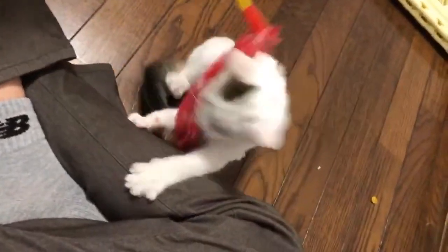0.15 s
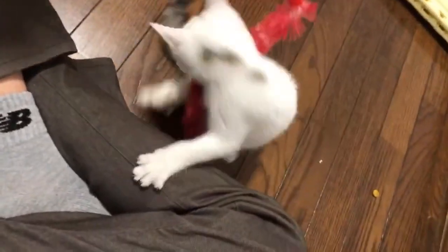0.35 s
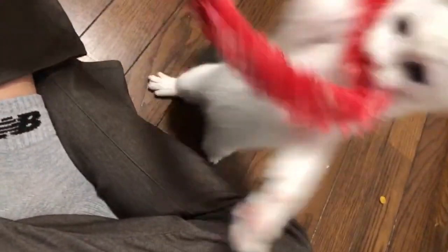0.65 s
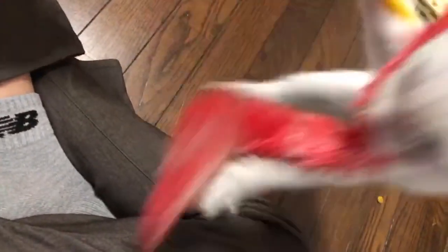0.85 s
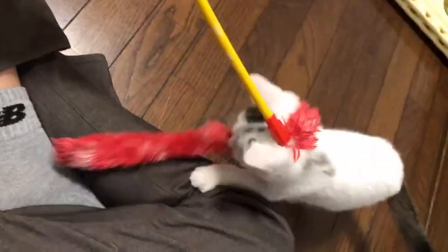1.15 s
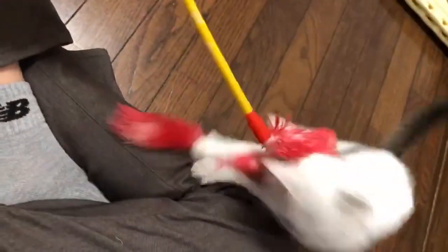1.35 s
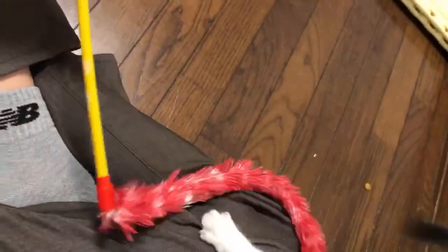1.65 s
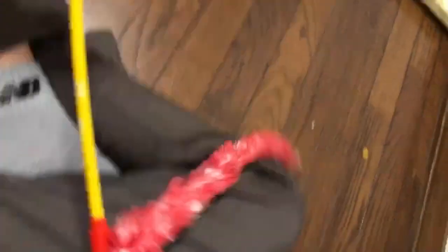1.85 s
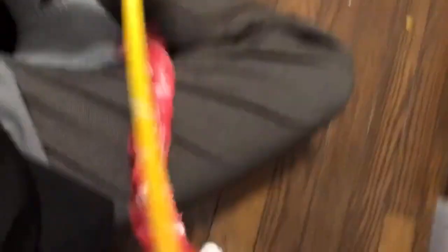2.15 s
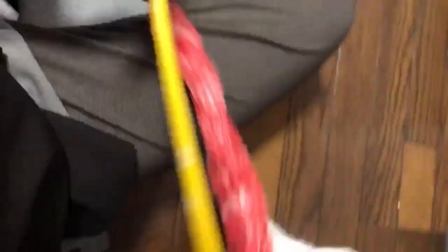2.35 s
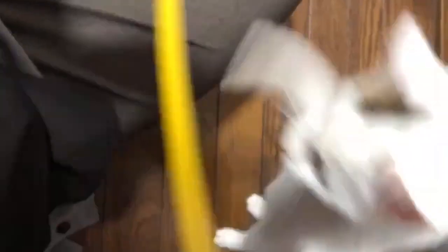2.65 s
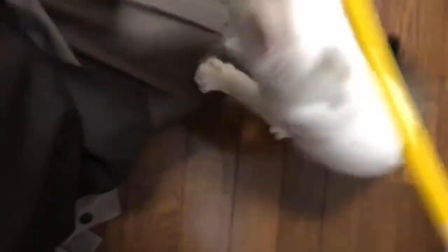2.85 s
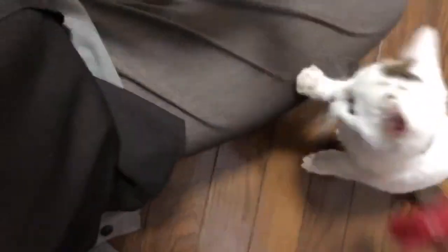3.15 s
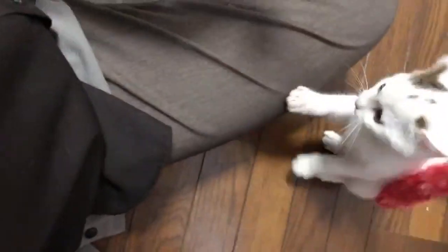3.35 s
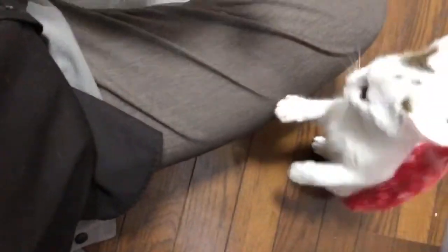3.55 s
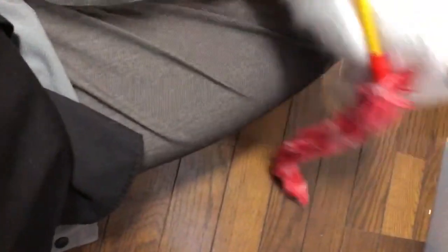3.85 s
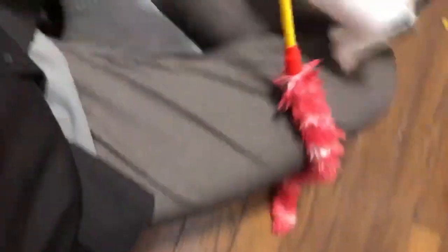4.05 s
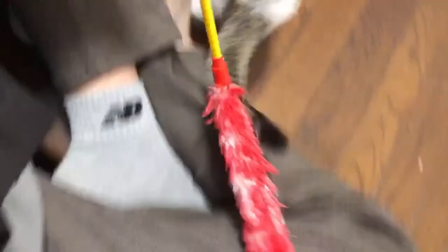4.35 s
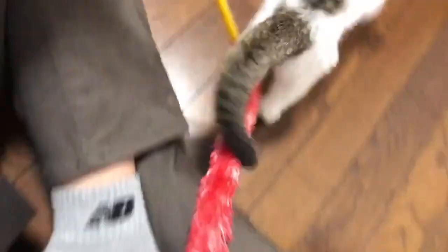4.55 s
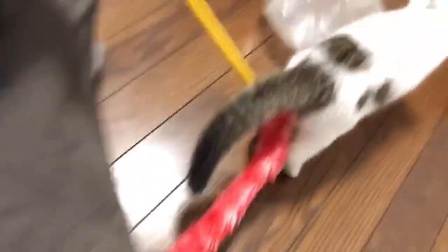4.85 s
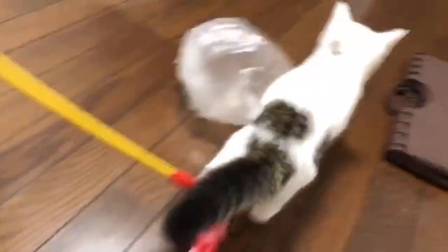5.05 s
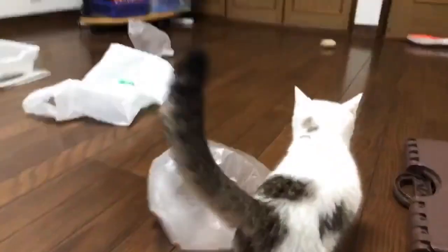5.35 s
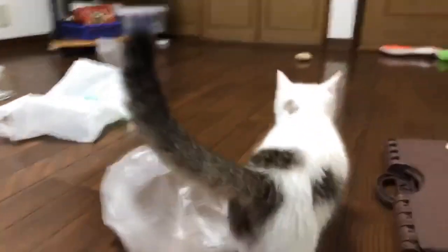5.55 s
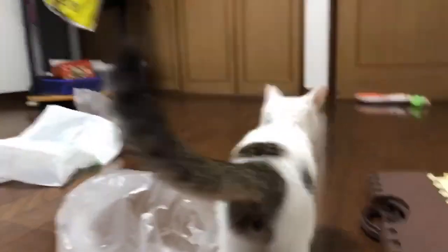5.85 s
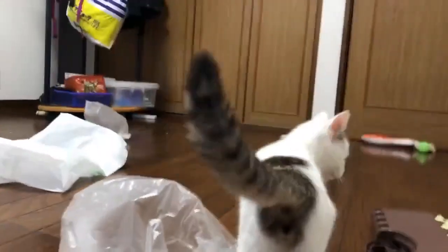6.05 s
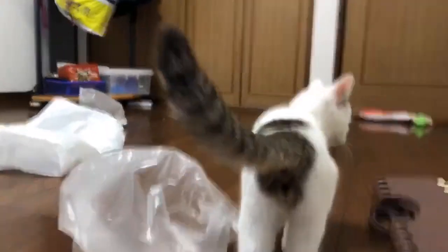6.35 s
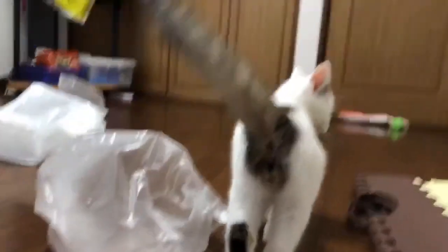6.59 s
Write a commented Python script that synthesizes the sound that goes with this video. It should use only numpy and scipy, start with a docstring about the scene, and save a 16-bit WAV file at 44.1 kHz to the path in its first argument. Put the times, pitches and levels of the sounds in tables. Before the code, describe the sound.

Close phone pickup of a kitten chasing a fluffy wand toy indoors. Dull padded landings come in a quick cluster, then a single heavy thump, then a short double thud around four seconds with small bright clicks. Brushing fibres and cloth stay very faint over low room hum. Near the end, four hard knocks, the first by far the loudest, clack and chatter before a brief hollow scrape.

```python
"""Kitten chasing a toy on a wooden floor

A kitten pounces and patters on boards in a small room, chasing a fluffy toy on a plastic wand.
Its paws set boards swinging; ticks, swishes of the toy and rustles of fluff and cloth are made of shaped noise.
At the end something hard knocks four times close by, with cracks and a thin ring, then skids on.
"""
import sys
import numpy as np
from scipy import signal
from scipy.fft import rfft, irfft, next_fast_len
from scipy.io import wavfile
from scipy.ndimage import map_coordinates

SR = 44100
rng = np.random.default_rng(int(sys.argv[2]) if len(sys.argv) > 2 else 0)


def dump_mix(stems):
    """Bounce the given channels to the path in sys.argv[1] as a 16-bit WAV at rate SR."""
    frames = np.atleast_2d(stems).T  # one column per channel
    limited = np.clip(frames, -1, 1)  # hard clip at full scale
    pcm = np.round(limited * 32767).astype(np.int16)
    wavfile.write(sys.argv[1], SR, pcm)


N = 296352  # length of the scene in samples
T = np.arange(SR * 3 // 4) / SR  # the clock of one short sound, in seconds

# Colour of cloth being brushed: (frequency [Hz], relative level [dB])
CLOTH_COLOUR = [(200, 3.5), (400, 0), (900, -0.5), (1600, -6), (2700, -9), (5000, -17.5), (10000, -30)]


def amp(db):
    """Turn decibels into a gain."""
    return 10 ** (np.asarray(db) / 20)


def unit(x):
    """Scale a sound to an average strength (rms) of 1."""
    return x / np.sqrt(np.mean(x ** 2) + 1e-20)


def along(points, hz):
    """Read a value between (frequency, value) points, on a logarithmic frequency axis."""
    point_hz, value = np.transpose(points)
    return np.interp(np.log(hz + 1), np.log(np.abs(point_hz) + 1), value)


def fade(t60, rise):
    """An envelope that swells over about rise seconds and dies by 60 dB in t60 seconds."""
    decay = np.exp(-np.log(1000) * T / max(t60, 1e-3))
    swell = 1 - np.exp(-T / max(rise, 1e-5))
    return decay * swell


def filtered(x, response):
    """Shape a sound by a gain (and phase) that depends on frequency."""
    size = next_fast_len(len(x) + SR // 10)  # spare room keeps the end from wrapping round
    hz = np.fft.rfftfreq(size, 1 / SR)
    return irfft(rfft(x, size) * response(hz), size)[:len(x)]


def noise(spectrum, size):
    """Random hiss, coloured by a spectrum and scaled to rms 1."""
    white = rng.standard_normal(size)
    return unit(filtered(white, lambda hz: amp(along(spectrum, hz))))


def wobble(rate):
    """A smooth random curve through rate random points a second."""
    knots = rng.standard_normal(int(N * rate / SR) + 4)
    return map_coordinates(knots, [np.arange(N) * rate / SR])


def scratchy(x, depth_db, rate=260):
    """Fibres catch and let go: the sound breaks into tiny grains."""
    return unit(x * amp(depth_db * wobble(rate)[:len(x)]))


def resonance(hz, centre_hz, q):
    """Response of one damped resonance, 1 at its centre and narrower for a higher q."""
    damping = 1j * hz * centre_hz / q
    return damping / (centre_hz ** 2 - hz ** 2 + damping)


def bending(x, lag):
    """Bending waves run faster the higher they are: 1 kHz arrives lag seconds late, the bass later still."""
    return filtered(x, lambda hz: np.exp(-4j * np.pi * lag * np.sqrt(1000 * hz)))


def add(track, start, sound):
    """Mix a sound into the track, starting at a time in seconds."""
    part = track[max(round(start * SR), 0):][:len(sound)]
    part += sound[:len(part)]


def in_room(x, wet_db, build=0.0075):
    """The walls smear a sound into a diffuse tail, where each frequency dies at its own speed."""
    # How long the room rings: (frequency [Hz], time to fall 60 dB [s])
    room_life = [(80, 0.38), (300, 0.3), (900, 0.44), (2500, 0.44), (6000, 0.33), (14000, 0.22)]
    hz, t, grains = signal.stft(rng.standard_normal(len(T)), SR, nperseg=256)
    decay = np.exp(-np.log(1000) * t / along(room_life, hz)[:, None])
    tail = signal.istft(grains * decay, SR, nperseg=256)[1][:len(T)]
    tail = tail * (1 - np.exp(-(T / build) ** 2))  # the echoes take a moment to gather
    echo = signal.fftconvolve(x, tail)[:len(T)]
    return x + amp(wet_db) * np.std(x) * unit(echo)


def board(hz, t60, rise):
    """A struck spot swings at one pitch, builds quickly and dies away."""
    return np.sin(2 * np.pi * hz * T) * fade(t60, rise)


def whole_floor(rise):
    """The floor swings in many modes at once, at slightly new pitches and strengths for every blow."""
    # Typical floor modes: (frequency [Hz], level [dB], time to fall 60 dB [s])
    floor_modes = [(101.7, -3, 0.23), (162, -9, 0.31), (277.9, -3.5, 0.21), (330.3, -1.5, 0.21),
                   (394.6, -0.5, 0.084), (531, -15, 0.25), (696, -21.5, 0.14), (970, -32, 0.13),
                   (1400, -43, 0.4)]
    ring = np.zeros(len(T))
    for hz, db, t60 in floor_modes:
        strength = amp(db + rng.normal(0, 2))
        pitch = hz * (1 + rng.normal(0, 0.014))
        ring += strength * board(pitch, t60, rise)
    return ring / np.abs(ring).max()


def paws():
    """A soft pad slaps and pushes one board, which clacks at its joint; a longer ring wakes more floor and room."""
    # Soft landings: (time [s], level [dB], board pitch [Hz], upper mode [Hz], upper mode level [dB],
    # pad slap level [dB], joint clack level [dB], board's time to fall 60 dB [s])
    landings = [(0.084, -59, 129, 267, 3, 2, -4.5, 0.13), (0.998, -27, 166, 287, -4, -12.5, -19, 0.115),
                (1.062, -23.5, 167, 258, 1, -23, -21.5, 0.094), (1.537, -43, 190, 239, 0.5, -15, -40, 0.06),
                (1.747, -24, 160, 240, -7.5, -23, -54, 0.049),
                (1.773, -20.5, 128, 260, -18, -42, -52, 0.073),
                (1.791, -25.5, 142, 348, -2.5, -12.5, -30, 0.092),
                (1.923, -19.5, 171, 280, -11, -17.5, -49, 0.071),
                (1.948, -19.5, 139, 241, -5.5, -31, -30, 0.069),
                (2.02, -11, 144, 233, -20.5, -53, -49, 0.052), (2.084, -18, 154, 234, -24, -46, -50, 0.046),
                (2.222, -40, 109, 295, -7.5, -35, -26, 0.051),
                (2.398, -38.5, 134, 327, -17, -26, -39, 0.066),
                (2.778, -37.5, 136, 385, -10.5, -24, -32, 0.044),
                (2.93, -12, 172, 245, -5, -27, -26, 0.066), (3.815, -42, 180, 237, -12, -28, -26, 0.05),
                (4.186, -26, 195, 337, -0.5, -11.5, -22.5, 0.028),
                (4.22, -14, 233, 301, -4.5, -32.5, -55, 0.035),
                (4.344, -36, 204, 315, 4.5, -13, -17.5, 0.14), (4.496, -38, 125, 334, 1.5, -13, -26, 0.072),
                (4.746, -43.5, 194, 240, -10, -19, -40, 0.067), (5.592, -51, 150, 390, -7, 2, -3, 0.073),
                (5.641, -38, 101, 440, 1.5, -16, -36, 0.03)]
    # Colour of the pad's slap: (frequency [Hz], relative level [dB])
    slap_colour = [(150, -17), (350, 13.5), (600, 8.5), (1000, -2), (1500, -17), (2400, -29), (3800, -22),
                   (5000, -29), (9000, -34), (15000, -49)]
    # Colour of the clack at the joint: (frequency [Hz], relative level [dB])
    joint_colour = [(700, 1.5), (1150, 2), (1600, 5), (2000, -7), (2350, -12.5), (3800, -15.5), (7000, -25),
                    (15000, -45)]
    usual_t60 = 0.08  # s, a board ringing this long wakes the floor and room by the plain amounts
    out = np.zeros(N)
    for start, db, hz, upper_hz, upper_db, slap_db, joint_db, t60 in landings:
        wake = t60 / usual_t60
        floor = amp(-5.5) * wake * whole_floor(rise=0.0034)
        upper = board(upper_hz, t60, rise=0.003) + floor
        low = board(hz, t60, rise=0.0054)
        thud = bending(low + amp(upper_db) * upper, lag=0.001433)
        contact = amp(slap_db) * noise(slap_colour, len(T)) + amp(joint_db) * noise(joint_colour, len(T))
        slap = contact * fade(0.85 * t60, rise=0.00042)  # a little shorter than the board's ring
        thud_room_db = -3.5 + 2.5 * np.log2(wake)  # 2.5 dB more room for each doubling of the ring
        add(out, start, amp(db) * (in_room(thud, thud_room_db) + in_room(slap, wet_db=-1.5)))
    return out


def knocks(deep_hz=135):
    """A hard contact cracks and clacks, the heavier body and the floor swing, and the rebounding object chatters."""
    # Hard knocks: (time [s], level [dB], pitch [Hz], its time to fall 60 dB [s], body pitch [Hz],
    # relative floor level [dB], relative clack level [dB], clack pitch [Hz], relative crack level [dB])
    blows = [(6.327, -3.5, 433, 0.017, 279, -15, -18, 630, -26.5),
             (6.435, -12.5, 492, 0.027, 264, -39, -5, 713, -16),
             (6.511, -25, 522, 0.054, 281, -36, -6.5, 1040, -12.5),
             (6.533, -15, 371, 0.069, 223, -32.5, -9, 1027, -18)]
    # Colour of the crack and chatter: (frequency [Hz], relative level [dB])
    crack_colour = [(200, -3), (600, 9), (1400, -1), (1900, -5), (2750, -6), (3300, -12.5), (5500, -22.5),
                    (7000, -26.5), (8200, -23.5), (10000, -32.5), (15000, -37)]
    # Thin ring of the hard object: (frequency [Hz], typical relative level [dB], time to fall 60 dB [s])
    case_modes = [(680, -1.5, 0.28), (790, 1, 0.4), (830, -4, 0.52), (1020, 0.5, 0.32), (1256, -10, 0.41),
                  (1420, 0, 0.15), (1820, -14, 0.27), (2190, -9, 0.28), (2450, -22, 0.26),
                  (2510, -10, 0.25), (3950, -19, 0.35), (8400, -23, 0.12)]
    body_db, body_growth = -10, 0.43  # the heavy swing gains only 0.43 dB per dB of the blow
    out = np.zeros(N)
    for start, db, hz, t60, body_hz, floor_db, clack_db, clack_hz, crack_db in blows:
        knock = amp(3.5) * board(hz, t60, rise=0.00095)
        clack = amp(clack_db + 4.5) * board(clack_hz, t60=0.028, rise=0.000049)
        deep = amp(floor_db + 2) * board(deep_hz, t60=0.11, rise=0.0092)
        floor = amp(floor_db - 1.5) * whole_floor(rise=0.0065)
        heavy = amp(body_db + (body_growth - 1) * db) * board(body_hz, t60=0.054, rise=0.0039)
        crack = amp(crack_db + 14) * noise(crack_colour, len(T)) * fade(t60=0.023, rise=0.00047)
        rattle = scratchy(noise(crack_colour, len(T)), depth_db=4, rate=300)
        chatter = amp(crack_db - 7.5) * rattle * fade(t60=0.27, rise=0.0056)
        ring = np.zeros(len(T))
        for mode_hz, mode_db, mode_t60 in case_modes:
            ring += amp(mode_db + rng.normal(0, 2.5)) * board(mode_hz, mode_t60, rise=0.0019)
        ring *= amp(crack_db - 11.5)
        contact = in_room(bending(knock + clack, lag=0.001466), wet_db=-13)
        body = in_room(bending(heavy + deep + floor, lag=0.0038), wet_db=-5)
        add(out, start, amp(db) * (contact + body + in_room(crack, wet_db=-10) + chatter + ring))
    return out


def slide():
    """After its last bounce the object skids over the boards with a hollow rub."""
    # Strength of the skid: (time [s], relative level [dB])
    skid_path = [(6.58, -52), (6.666, -41.5), (6.712, -42), (6.72, -42)]
    # Colour of the rub: (frequency [Hz], relative level [dB])
    skid_colour = [(120, -7), (230, -2), (300, -3), (400, 8), (500, -18), (700, -7.5), (880, -4.5),
                   (1100, -8.5), (1500, -19.5), (3000, -29.5), (8000, -45)]
    times, db = np.transpose(skid_path)
    pressure = np.interp(np.arange(N) / SR, times, amp(db - 2.5), left=0)
    return pressure * scratchy(noise(skid_colour, N), depth_db=0.5, rate=62)


def ticks():
    """Claws, wand and a board joint make tiny sharp contacts, each bright around its own pitch."""
    # Contacts: (time [s], relative level [dB], centre [Hz], sharpness Q, time to fall 60 dB [s], room level [dB])
    contacts = [(1.623, -47, 960, 6, 0.038, -5), (1.948, -53, 1670, 13, 0.017, -5),
                (2.775, -41.5, 12300, 1.3, 0.013, -8), (3.18, -68, 11000, 3, 0.11, -7),
                (4.189, -48, 3500, 0.65, .003, -14), (4.192, -40, 3480, 0.81, 0.0027, -12),
                (4.212, -49, 5000, 0.72, .003, -14), (4.348, -36.5, 4240, 7.4, 0.019, -8),
                (4.365, -40.5, 4700, 3.5, 0.021, -3), (5.221, -58.5, 7000, 2, 0.022, -4)]
    out = np.zeros(N)
    for start, db, centre_hz, q, t60, room_db in contacts:
        white = rng.standard_normal(len(T))
        chip = unit(filtered(white, lambda hz: resonance(hz, centre_hz, q)))
        add(out, start, amp(db + 0.5) * in_room(chip * fade(t60, rise=0.0001), room_db))
    return out


def swishes():
    """The toy is whipped over cloth: a hiss of fibres on a lower brushing sound."""
    # Quick strokes: (time [s], level [dB], relative low brush level [dB], rise [s], time to fall 60 dB [s])
    strokes = [(1.6108, -45, 14, 0.012, 0.21), (1.895, -60.5, -7, 0.005, 0.33),
               (4.16, -49.5, 13, 0.0091, 0.22), (4.348, -50, 0, 0.0062, 0.41),
               (4.8545, -47.5, -3, 0.0043, 0.54)]
    # Colour of the hiss: (frequency [Hz], relative level [dB])
    hiss_colour = [(880, -32), (1500, -9), (2350, 3), (2640, 0.5), (2780, -1.5), (7670, -2), (8290, -1.5),
                   (15500, -10)]
    out = np.zeros(N)
    for start, db, brush_db, rise, t60 in strokes:
        hiss = noise(hiss_colour, len(T))
        brush = amp(brush_db + 1) * noise(CLOTH_COLOUR, len(T))
        rub = scratchy(unit(hiss + brush), depth_db=0.1)
        add(out, start, amp(db) * rub * fade(t60, rise))
    return out


def rustle(catch_rate=130):
    """Fluff and cloth rustle, swelling with each stir; fibres catch and snap free about catch_rate times a second."""
    # Slow stirrings of fluff and cloth, as the kitten bites the toy or trousers shift:
    # (middle [s], length [s], relative fluff level [dB], relative cloth level [dB])
    stirs = [(1.883, 0.39, -60, -61.5), (2.707, 0.68, -71, -62.5), (3.557, 0.29, -57, -78),
             (4.362, 0.48, -62, -59.5), (5.05, 0.58, -61.5, -63), (5.53, 0.51, -60.5, -58.5)]
    # Colour of the fluff: (frequency [Hz], relative level [dB])
    fluff_colour = [(1200, -9.5), (2400, -5.5), (3200, -3.5), (8000, -9), (12500, -11), (15500, -24)]
    fluff_power, cloth_power = amp(-73.5) ** 2, amp(-68.5) ** 2  # the faint rustle between stirs
    for middle, length, fluff_db, cloth_db in stirs:
        swell = np.exp(-(2 * (np.arange(N) / SR - middle) / length) ** 2)
        fluff_power = fluff_power + amp(fluff_db) ** 2 * swell
        cloth_power = cloth_power + amp(cloth_db) ** 2 * swell
    catches = (rng.random(N) < catch_rate / SR) * rng.uniform(0.3, 1, N)
    snap_envelope = signal.fftconvolve(catches, fade(t60=0.014, rise=0.000197))[:N]
    snaps = unit(snap_envelope * noise(fluff_colour, N))
    fluff = amp(-13) * noise(fluff_colour, N) + amp(-14) * snaps
    cloth = amp(-4) * scratchy(noise(CLOTH_COLOUR, N), depth_db=1.5, rate=47)
    return np.sqrt(fluff_power) * fluff + np.sqrt(cloth_power) * cloth


def room_tone():
    """The quiet room: a steady noise, strongest in the bass."""
    # Colour of the quiet room: (frequency [Hz], relative level [dB])
    room_colour = [(15, -62), (25, -15), (37, 2.5), (69, 0), (101, 3), (129, -4), (198, -8.5), (240, 0.5),
                   (274, -4), (762, -13.5), (1080, -18.5), (1850, -20), (7300, -26), (15500, -30)]
    return amp(-64.5) * noise(room_colour, N)


def scene():
    """Kitten, toy and knocking object over the quiet room, in one channel."""
    play = paws() + knocks() + slide() + ticks() + swishes() + rustle()
    return (play + room_tone())[None]


def record(dry, low_cut_hz=62, top_hz=15850):
    """The phone thins the deep bass and keeps nothing from its upper band limit upwards."""
    bass_cut = signal.butter(4, low_cut_hz, "high", fs=SR, output="sos")
    thin = signal.sosfilt(bass_cut, dry)
    return np.array([filtered(channel, lambda hz: hz < top_hz) for channel in thin])


dry = scene()
out = record(dry)
dump_mix(out)
```